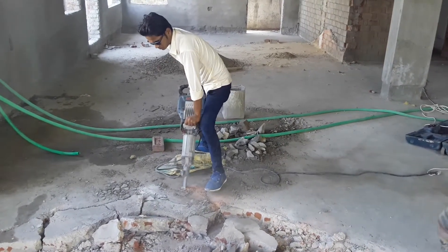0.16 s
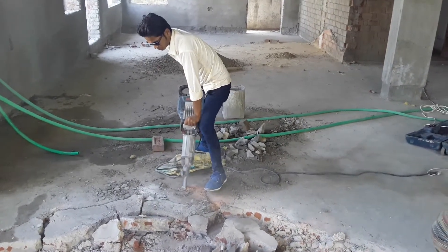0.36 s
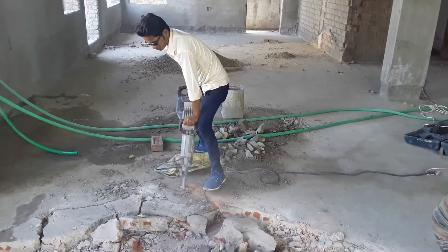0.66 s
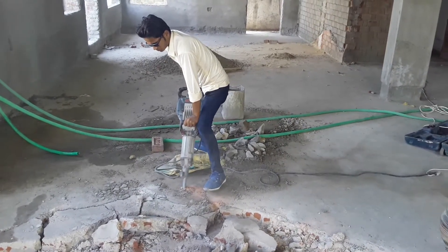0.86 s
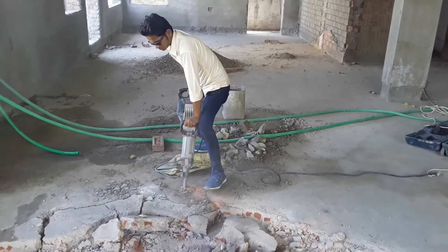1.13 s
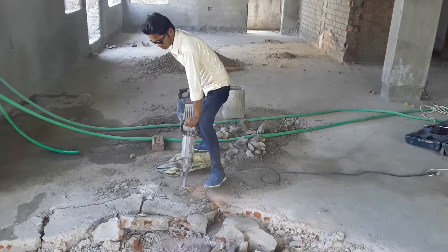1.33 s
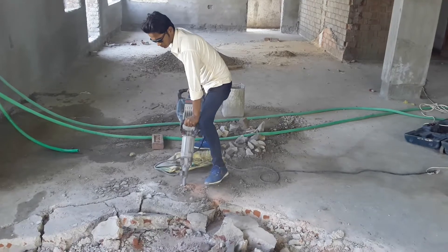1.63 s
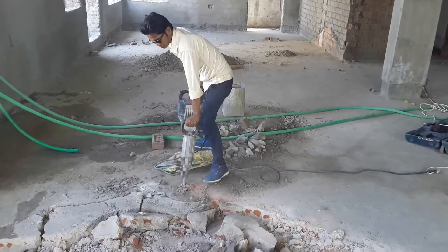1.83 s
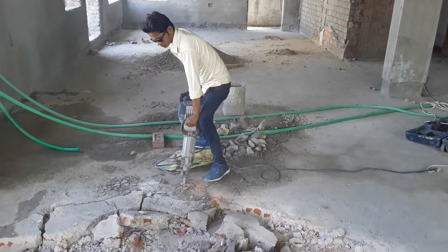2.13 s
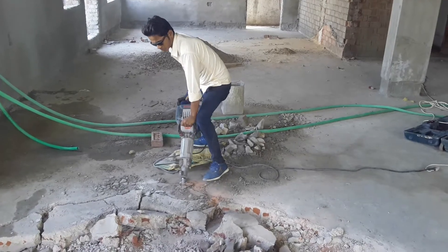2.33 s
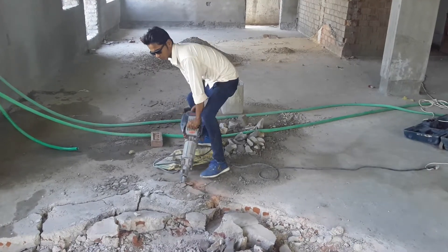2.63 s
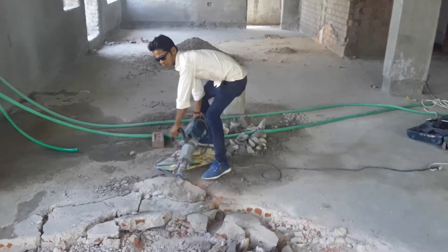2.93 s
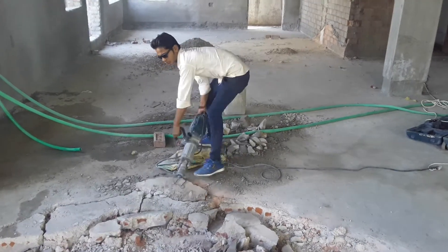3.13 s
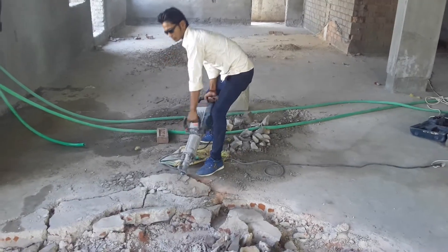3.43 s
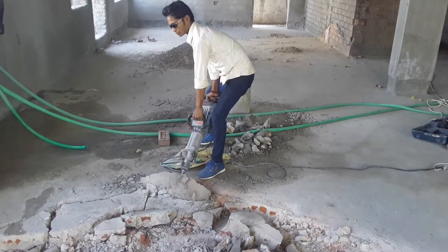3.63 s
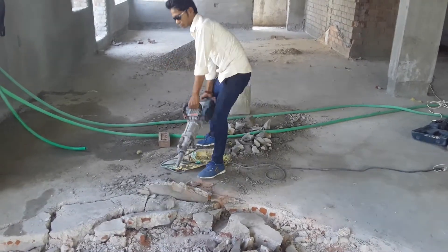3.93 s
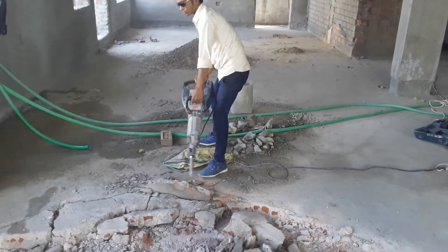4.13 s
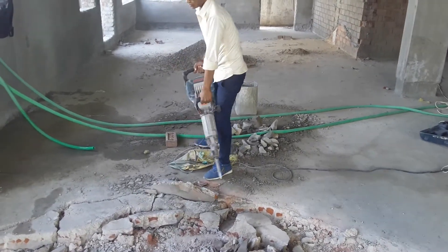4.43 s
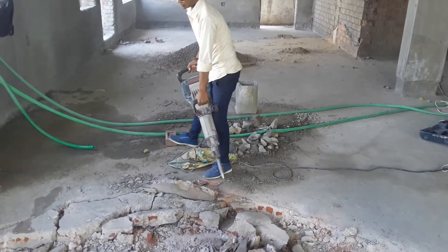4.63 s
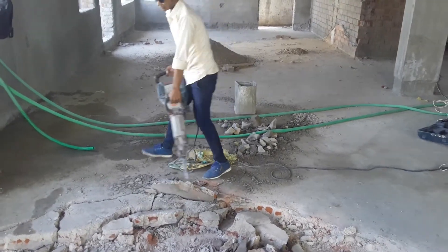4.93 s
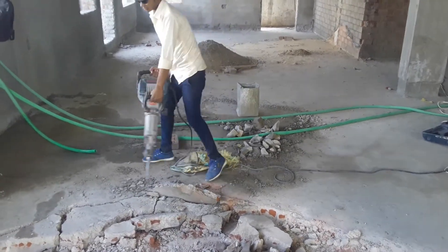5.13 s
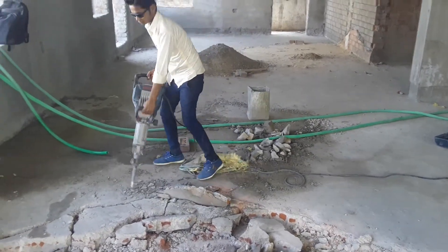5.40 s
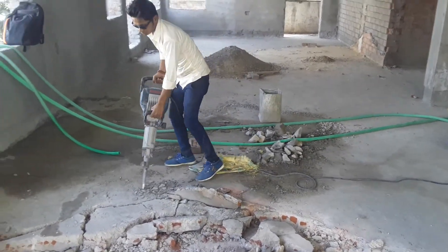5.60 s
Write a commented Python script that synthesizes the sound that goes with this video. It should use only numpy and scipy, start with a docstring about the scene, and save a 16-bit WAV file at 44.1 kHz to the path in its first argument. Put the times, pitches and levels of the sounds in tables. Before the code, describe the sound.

Rapid hard machine-gun-like hammering on concrete, with metallic clatter, dull body knocks and echoes off bare walls, over fan roar. Midway the chisel lifts, the hall tail dies away and the motor runs free, its airy roar growing while a wavering whine climbs and settles. Finally the tip bumps loose slabs in three soft low thuds. Single-channel phone sound from a few metres away.

```python
"""An electric demolition hammer pounds a concrete floor about 22 times a second in a bare hall, over fan roar.
Each blow is shaped noise in four parts (chisel crack, housing, slab, sizzle) with echoes and a hall tail,
plus a clang of modulated noise and decaying sine modes. At 2.45 s the chisel is lifted and the blows stop;
the freed motor speeds up: louder air noise and a rising whine of three partials.
Near the end the tip lands on loose slabs: three soft thuds of low noise over a low rumble."""
import sys
import numpy as np
from scipy import signal
from scipy.fft import rfft, irfft, next_fast_len
from scipy.io import wavfile
from scipy.ndimage import uniform_filter1d, map_coordinates

SR = 44100
rng = np.random.default_rng(int(sys.argv[2]) if len(sys.argv) > 2 else 0)


def wav_record(signal):
    """Record a signal, one row per channel, as 16-bit PCM in the file named by sys.argv[1]."""
    frames = np.transpose(np.atleast_2d(signal))
    bounded = np.clip(frames, -1, 1)
    # unit amplitude maps onto the largest positive 16-bit level
    quanta = np.round(bounded * 32767).astype(np.int16)
    wavfile.write(sys.argv[1], SR, quanta)


N = 254016
LIFT_S = 2.45  # the chisel leaves the concrete


def amp(db):
    """Decibels to amplitude factor."""
    return 10 ** (np.asarray(db) / 20)


def unit(x):
    """Scale to rms 1 over the whole array."""
    return x / np.sqrt(np.mean(x ** 2) + 1e-20)


def curves(rows):
    """One value per sample for each column after the time."""
    time_s, *columns = np.transpose(rows)
    return [np.interp(np.arange(N) / SR, time_s, column) for column in columns]


def wobble(knots_per_s):
    """A smooth random curve through Gaussian knots."""
    knots = rng.standard_normal(int(N * knots_per_s / SR) + 4)
    return map_coordinates(knots, [np.arange(N) * knots_per_s / SR])


def coloured(x, spectrum):
    """Noise rows shaped by (Hz, dB) points on a log frequency axis, rms 1."""
    f, db = np.transpose(spectrum)
    m = next_fast_len(x.shape[-1] + 4096)
    hz = np.fft.rfftfreq(m, 1 / SR)
    gain = amp(np.interp(np.log(hz + 1), np.log(f + 1), db, -120, -120))
    return unit(irfft(rfft(x, m) * gain, m)[..., :x.shape[-1]])


def decay(t, t60, attack):
    """Zero before t = 0, a short rise, then 60 dB down after t60."""
    u = np.maximum(t, 0)
    return amp(-60 * u / t60) * (1 - np.exp(-u / attack))


def blow_times():
    """Each blow follows the last after one stroke, which varies with the load on the motor."""
    # two trains of blows, the second setting in early: (first blow [s], number of blows)
    trains = [(.0037, 30), (1.2969, 25)]
    # stroke, longer as the chisel sinks in: (time [s], time to the next blow [ms])
    stroke = [(0, 43.36), (.13, 43.9), (.5, 42.96), (.72, 43.12), (1.25, 45.78), (1.65, 46.82),
              (2.15, 48.85), (2.3, 48.41), (2.44, 48.02)]
    when_s, stroke_ms = np.transpose(stroke)
    times = []
    for s, count in trains:
        for _ in range(count):
            times.append(s)
            s += np.interp(s, when_s, stroke_ms) / 1000
    return np.array(times)


def clang(t, crack_db, clang_hz, alike, power):
    """The shank clangs at each arrival: low-passed rattle ring-modulated to its pitch, more for hard blows."""
    # rattle around the pitch: (offset from the pitch [Hz], relative density [dB per Hz])
    clang_band = [(1, -5), (250, 1), (600, -12), (1200, -40)]
    fresh = rng.standard_normal((len(crack_db), len(t)))
    # the drift starts from rest, so the clang builds up over the first blows
    rattle = coloured(signal.lfilter([1], [1, -alike], fresh, axis=0), clang_band)
    carrier = np.sin(2 * np.pi * clang_hz[:, None] * t)
    level_db = crack_db + 1.4 * (crack_db + 15.5) - 3.5
    return amp(level_db)[:, None] * rattle * carrier * np.sqrt(power)


def bursts(t, levels_db, clang_hz):
    """Noise bursts repeat at each arrival and feed a hall tail; their grain drifts slowly from blow to blow."""
    # arrivals of a blow, then off nearby surfaces:
    # (delay [s], chisel [dB], housing [dB], slab [dB], sizzle [dB])
    arrivals = [(-.003, -19, -7.5, -7, -30), (.0003, 1.5, 0.5, 1, 2), (.006, -6.5, 1, 0, -1.5),
                (.0105, -7, -5, -13.5, -3.5), (.014, -4.5, -5, -14, -4), (0.018, -3.5, -9, -16, -5),
                (0.023, -12.5, -6.5, 1, -9), (.030, -7.5, -11.5, -9, -17)]
    # chisel, housing, slab, sizzle: (burst t60 [s], hall tail [dB], hall t60 [s],
    # likeness of one blow to the next [0-1, capped at 0.98], gain [dB])
    parts = [(0.014, -13.5, 0.1, 0.95, 1.5), (0.022, -10.5, 0.52, 0.91, -4), (0.087, -1.5, 1, 0.98, -4.5),
             (0.019, -13, 0.18, 1, -1)]
    # spectra of the four parts: (frequency [Hz], relative density [dB per Hz])
    chisel = [(1800, -7.5), (2800, 3), (3700, 1.5), (4600, 2.5), (5500, -7), (7000, -13), (8000, -38)]
    housing = [(750, -9), (1000, -12), (1650, -13), (1900, -6.5), (2300, -7), (2750, -9.5), (3500, -32)]
    slab = [(25, -31), (60, -15), (140, -6), (220, -2.5), (270, -7), (400, -5.5), (530, -2.5), (640, -5),
            (900, -15), (1170, -37)]
    sizzle = [(3820, -32), (6500, -34), (7420, -1.5), (8400, 3), (10500, 4), (14200, -7), (15200, -7),
              (16000, -12)]
    spectra = [chisel, housing, slab, sizzle]
    delay_s, *arrive_db = np.transpose(arrivals)
    rows = np.zeros((len(clang_hz), len(t)))
    for part, spectrum, level_db, echo_db in zip(parts, spectra, levels_db, arrive_db):
        burst_s, tail_db, hall_s, alike, gain_db = part
        alike = np.clip(alike, 0, .98)
        fresh = rng.standard_normal(rows.shape)
        fresh[1:] *= np.sqrt(1 - alike ** 2)
        grain = coloured(signal.lfilter([1], [1, -alike], fresh, axis=0), spectrum)
        power = np.zeros(len(t))
        for d, db in zip(delay_s, echo_db):
            attack_s = burst_s / 40 + 0.014 * abs(d)  # rough walls smear the later arrivals
            power += (amp(db) * decay(t - d, burst_s, attack_s)) ** 2
        if spectrum is chisel:
            rows += clang(t, level_db, clang_hz, alike, power)
        power += (amp(tail_db) * decay(t, hall_s, 0.0024)) ** 2
        # every blow carries its full energy
        evenness = np.sqrt(power.sum() / (grain ** 2 * power).sum(axis=1))
        rows += (amp(level_db + gain_db) * evenness)[:, None] * grain * np.sqrt(power)
    return rows


def rings(t, blow_s, housing_db, slab_db, steel_db):
    """Each blow rings decaying sine modes of chisel, housing and slab, randomly strong and detuned."""
    # modes of free chisel, housing and slab: (mean frequency [Hz], mean relative level [dB], t60 [s])
    steel = [(8500, 0, .05), (9540, -6, .06), (10970, -3, 0.13), (13200, -9, .08)]
    shell = [(1928, -3, 0.05), (2253, -5, 0.062)]
    plate = [(187, -9, 0.16), (380.4, -0.5, 0.12), (513, -2, 0.1)]
    # as the slab cracks each mode has its loudest moment
    plate_peak_s, plate_fall_db_per_s = [1.44, 1.44, 1], 10.5
    plate_db = [slab_db - plate_fall_db_per_s * abs(blow_s - peak) for peak in plate_peak_s]
    bodies = [(steel, [steel_db] * len(steel)), (shell, [housing_db] * len(shell)), (plate, plate_db)]
    rows = np.zeros((len(blow_s), len(t)))
    for modes, levels_db in bodies:
        for (hz, db, t60_s), level_db in zip(modes, levels_db):
            strength, detune = rng.standard_normal((len(blow_s), 2)).T[:, :, None]
            ring = np.sin(2 * np.pi * hz * (1 + 0.003 * detune) * t) * decay(t, t60_s, 0.0032)
            rows += amp(level_db[:, None] + db + 2.0 * strength) * ring
    return rows


def hammer():
    """Blows of noise bursts and rings, their balance and pitch changing as the chisel sinks in."""
    # chisel crack before scatter and part gain: (time [s], level [dB])
    crack = [(0, -15), (.3, -16.5), (.45, -15), (.8, -13.5), (.95, -11.5), (1.1, -10.5), (1.28, -12.5),
             (1.43, -11.5), (1.8, -11.5), (2.44, -12)]
    # response of the parts, before their gains: (time [s], housing [dB], slab [dB], sizzle [dB],
    # free steel ring [dB], chisel clang [Hz])
    contact = [(0, -6.5, -20, -27.5, -34, 4430), (.3, -8, -18.5, -25.5, -54, 4540),
               (0.601, -6.5, -18, -25.5, -50, 4380), (.9, -6, -19.5, -23, -55, 4024),
               (1.2, -7.5, -18.5, -25, -52, 3660), (1.502, -8, -20, -22, -51, 3410),
               (1.8, -7.5, -20, -23, -44, 3550), (2.1, -8, -19.5, -20, -34, 3520),
               (2.441, -8.5, -23.5, -22, -23.5, 3870)]
    crack_scatter_db = 0.9  # from blow to blow
    lead, length = SR // 200, SR // 2  # samples; the lead holds the arrival ahead of the blow
    t = (np.arange(length) - lead) / SR
    blow_s = blow_times()
    crack_db = np.interp(blow_s, *np.transpose(crack))
    crack_db += crack_scatter_db * rng.standard_normal(len(blow_s))
    when_s, *columns = np.transpose(contact)
    housing_db, slab_db, sizzle_db, steel_db, clang_hz = [np.interp(blow_s, when_s, c) for c in columns]
    rows = bursts(t, [crack_db, housing_db, slab_db, sizzle_db], clang_hz)
    rows += rings(t, blow_s, housing_db, slab_db, steel_db)
    out = np.zeros(N + lead + length)
    for start_s, row in zip(blow_s, rows):
        out[round(start_s * SR):][:length] += row
    return out[lead:N + lead]


def rush(spectrum, patchy_db, size):
    """Noise of rms 1 with patches of random gain; a longer window gives narrower, longer patches."""
    z = signal.stft(rng.standard_normal(N + size), nperseg=size)[2]
    field = uniform_filter1d(rng.standard_normal(z.shape), size=3, axis=0)
    field = uniform_filter1d(field, size=8, axis=1)
    patchy = signal.istft(z * amp(patchy_db * unit(field)), nperseg=size)[1][:N]
    return coloured(patchy, spectrum)


def cooling_air(roar_db, hiss_db):
    """Cooling air roars and hisses through the housing: two bands of patchy noise with a shared flutter."""
    # band spectra: (frequency [Hz], relative density [dB per Hz])
    roar = [(150, -52), (290, -20.5), (480, -14), (670, -17), (940, -12.5), (1400, -6), (1720, -7.5),
            (1860, -1), (2180, 1.5), (2500, -4.5), (3250, -6), (4300, -11), (5020, -20.5), (6500, -27),
            (8450, -50)]
    hiss = [(2940, -36), (5000, -4), (7900, -3.5), (8670, -2.5), (8790, -0.5), (9460, 0), (9650, -1.5),
            (13600, -17), (16000, -17)]
    flutter_db = 0.85 * wobble(250) + 0.14 * wobble(15)
    air = amp(roar_db + 1.0 + flutter_db) * rush(roar, patchy_db=2.0, size=2048)
    air += amp(hiss_db - 1.0 + 0.88 * flutter_db) * rush(hiss, patchy_db=2.5, size=512)
    return air


def armature_whine(hiss_db):
    """The freed armature sings in three partials, rising exponentially in pitch, wavering in the echoes."""
    # partials before a common trim, swelling and fading as the tool is carried about:
    # (time [s], first partial [dB], second partial [dB])
    partials = [(2.45, -36, -55), (2.62, -34.5, -61), (2.76, -30, -58), (2.84, -24.5, -48),
                (2.91, -32, -38), (3.15, -49, -64), (3.35, -36, -45), (3.5, -24, -42), (3.63, -44, -52),
                (3.85, -25, -34), (3.96, -28.5, -41), (4.14, -26, -39.5), (4.32, -29, -38),
                (4.45, -24.5, -37), (4.68, -22, -33), (4.79, -20.5, -40), (4.88, -38, -41),
                (4.99, -28.5, -29.5), (5.17, -20, -41), (5.38, -33.5, -40), (5.45, -22.5, -37),
                (5.57, -19, -40), (5.76, -21.5, -44)]
    loaded_hz, free_hz, spin_up_s = 3130, 4563, .41
    echo_ratio = 0.33  # of each wobble to the direct sound
    first_db, second_db = curves(partials)
    third_db = hiss_db - 26 + 3 * wobble(8)
    since_s = np.maximum(np.arange(N) / SR - LIFT_S, 0)
    hz = free_hz - (free_hz - loaded_hz) * np.exp(-since_s / spin_up_s)
    phase = 2 * np.pi * np.cumsum(hz + 5 * wobble(25)) / SR
    freed = np.clip(since_s / 0.042, 0, 1)
    whine = np.zeros(N)
    for k, db in enumerate([first_db, second_db, third_db], start=1):
        fading = 1 + echo_ratio * (wobble(35) + 1j * wobble(35))
        whine += amp(db + 2.5) * np.imag(fading * np.exp(1j * k * phase))
    return freed * whine


def motor():
    """Fan noise throughout, joined by the armature's whine once the load is off."""
    # cooling air before trims: (time [s], roar [dB], hiss [dB])
    air_levels = [(0, -25.5, -48), (.6, -19, -36.5), (1.15, -25, -44.5), (2.3, -21.5, -39.5),
                  (2.55, -23.5, -46.5), (2.8, -22, -41.5), (3.05, -19, -41.5), (3.4, -18, -40.5),
                  (3.7, -16, -35.5), (4, -15, -32.5), (4.3, -14, -34), (4.8, -14.5, -34), (5.3, -13.5, -31),
                  (5.76, -14, -33)]
    roar_db, hiss_db = curves(air_levels)
    return cooling_air(roar_db, hiss_db) + armature_whine(hiss_db)


def rumble_and_bumps():
    """Low noise: a rumble that fades after the lift, and soft thuds without a ring."""
    # chisel tip set down on loose slabs, before trim and attack: (time [s], level [dB])
    set_downs = [(5.573, -35), (5.629, -33), (5.679, -33)]
    final_db, excess_db, fade_s = -52.5, 13, 1.9  # rumble: last level, excess until the lift, time constant
    t = np.arange(N) / SR
    rumble_db = final_db + excess_db * np.exp(-np.maximum(t - LIFT_S, 0) / fade_s)
    push = amp(rumble_db + 2.2 * wobble(9))
    for s, db in set_downs:
        push += amp(db - 0.5) * decay(t - s, 0.14, .004)
    spectrum = [(25, -29), (60, -7.0), (150, -4), (300, -6.5), (450, -10)]  # (Hz, dB per Hz)
    return push * coloured(rng.standard_normal(N), spectrum)


def scene():
    """Sum of hammer, motor and low thuds, one channel."""
    return (hammer() + motor() + rumble_and_bumps())[None]


def record(dry):
    """The phone rounds off the highest peaks, thins the deep bass and keeps nothing above its band limit."""
    top_hz, bass_hz = 15850, 55
    soft = dry / (1 + np.abs(dry / .97) ** 8) ** (1 / 8)
    m = next_fast_len(N + 4096)
    hz = np.fft.rfftfreq(m, 1 / SR)
    bass = (1j * hz / (bass_hz + 1j * hz)) ** 2
    return irfft(rfft(soft, m) * bass * (hz < top_hz), m)[:, :N]


dry = scene()
out = record(dry)
wav_record(out)
```